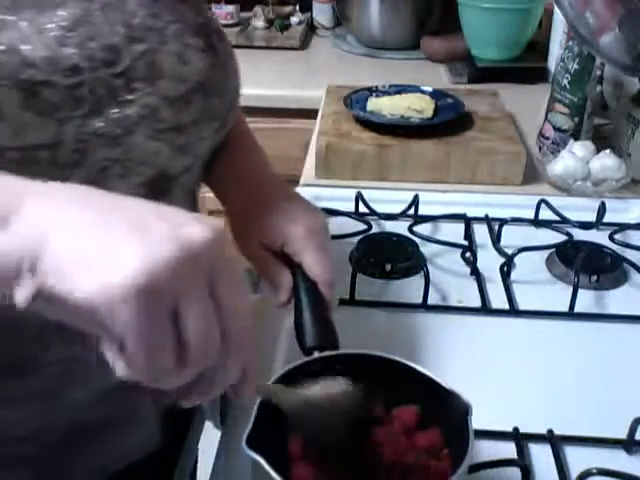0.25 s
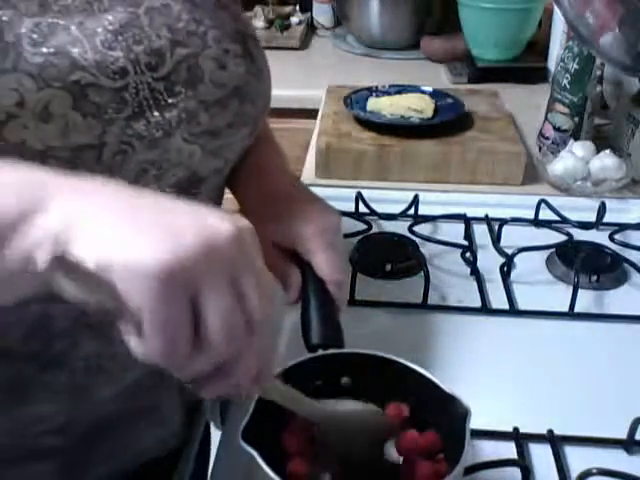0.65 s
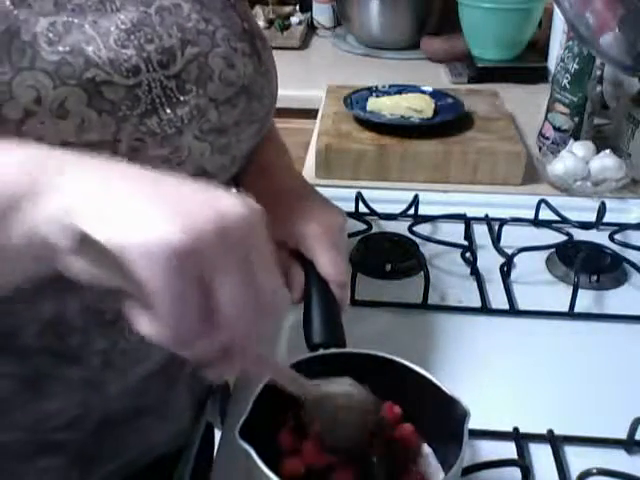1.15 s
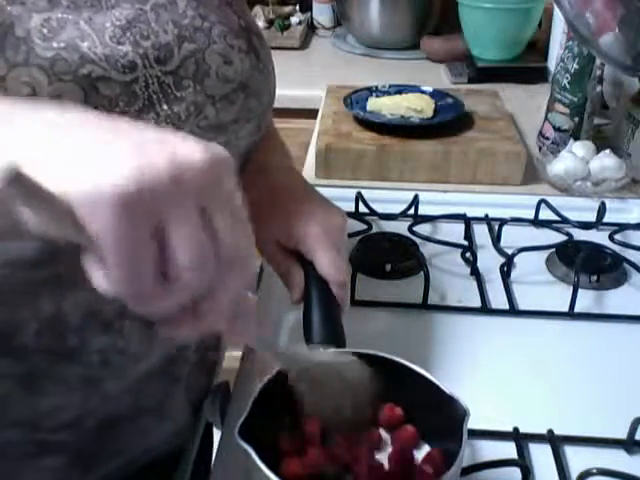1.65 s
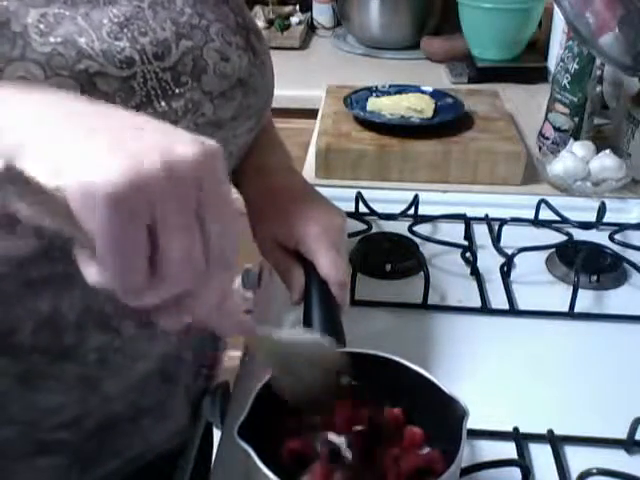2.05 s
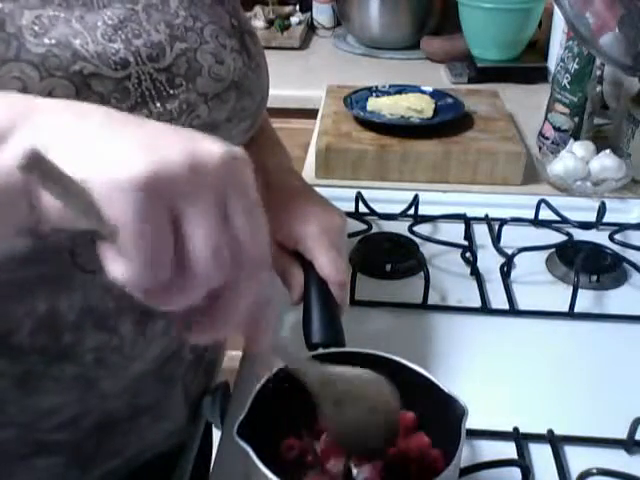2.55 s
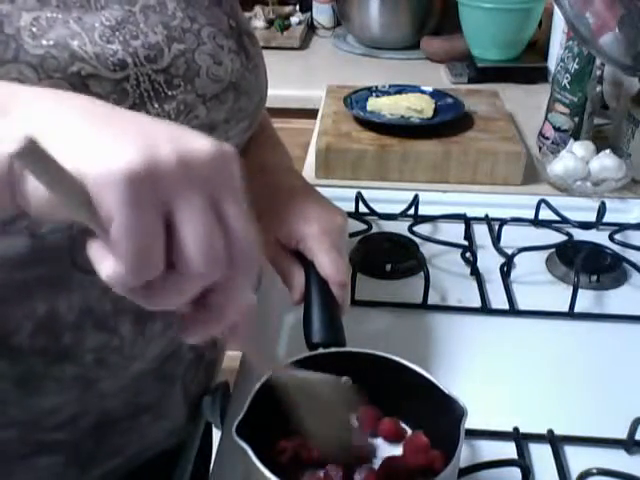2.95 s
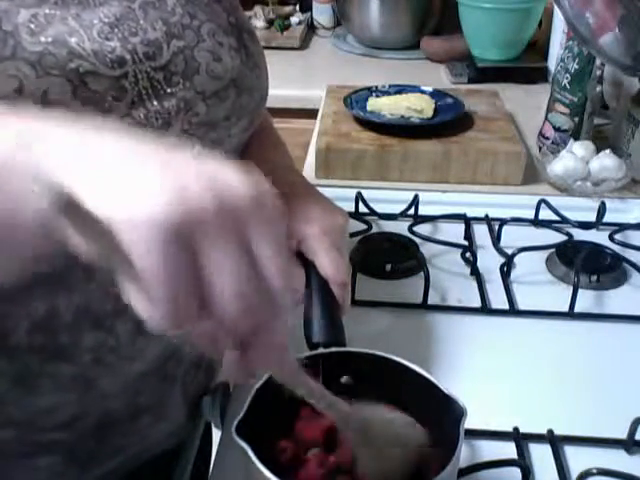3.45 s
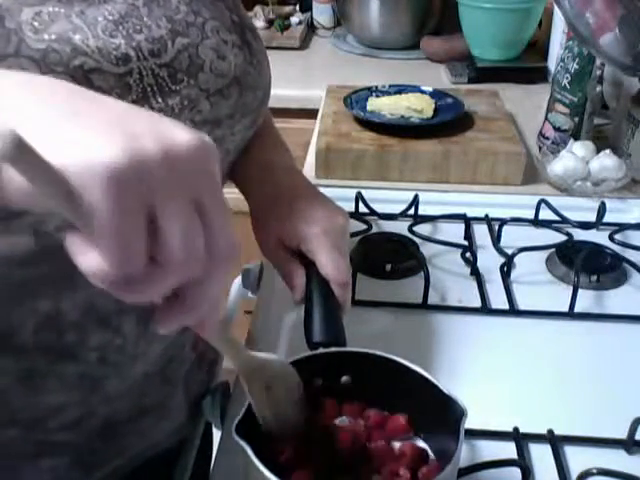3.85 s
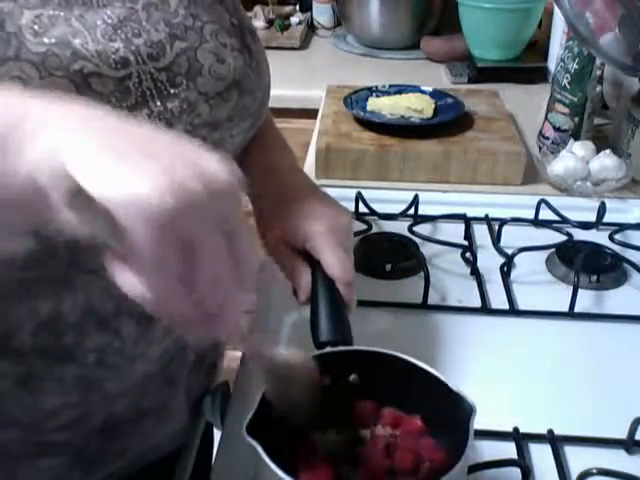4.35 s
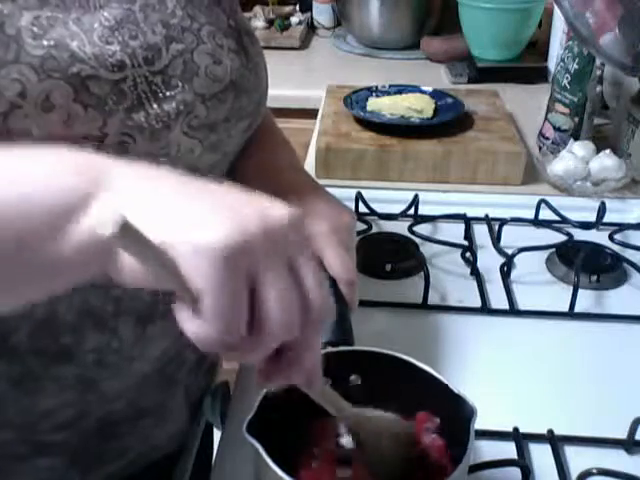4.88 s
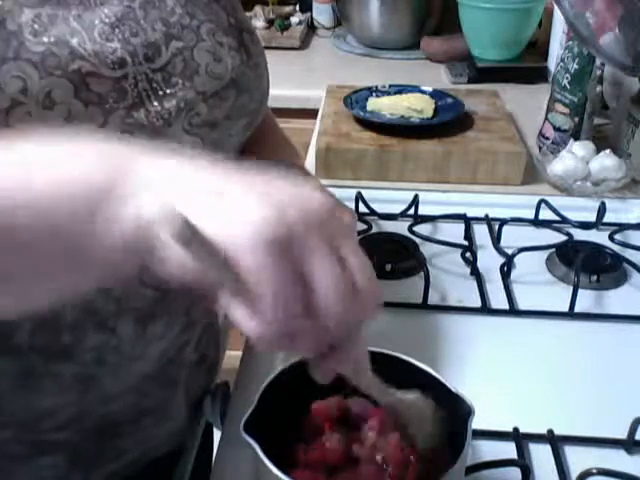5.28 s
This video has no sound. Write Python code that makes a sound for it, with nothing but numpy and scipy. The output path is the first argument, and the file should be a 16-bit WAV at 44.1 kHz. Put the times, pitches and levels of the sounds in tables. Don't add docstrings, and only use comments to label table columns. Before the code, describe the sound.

A wooden spoon stirs fruit and sugar in a small metal saucepan, close to a basic microphone. In the first 0.3 seconds it lands with a cluster of light clicking bounces and a soft thud. Faint gritty scrapes and muffled taps follow until a firm, dry knock at 1.06. Quiet dragging continues, with a small tap at 1.7. A harder clack at 2.17 is followed by quick bounces and a low stove thump, then a soft tap at 2.4. Subdued, sugary strokes fill about 2.5 to 4.3. The hardest crack, clipped, hits at 4.35, with bounces, the most obvious scrape around 4.55 and deep thuds to 4.65. Soft taps come near 5.0, a bright metallic wall knock rings at 5.37, and a thinner ring with a sugary crunch ends it at 5.5. Short hard-room echo, uneven low rumble, fridge hum, faint electronic whine and hiss run underneath.

```python
import sys
import numpy as np
from scipy import signal
from scipy.fft import rfft, irfft, next_fast_len
from scipy.io import wavfile
from scipy.ndimage import uniform_filter1d

SR = 44100
rng = np.random.default_rng(int(sys.argv[2]) if len(sys.argv) > 2 else 0)


def invert_db(x):
    u = np.asarray(x, float) / 20
    return 10 ** u


def wav_record(signal):
    frames = np.transpose(np.atleast_2d(signal))
    bounded = np.clip(frames, -1, 1)
    quanta = np.round(bounded * 32767).astype(np.int16)
    wavfile.write(sys.argv[1], SR, quanta)


N = 243431
T = np.arange(N) / SR
SIZE = 1024


def level(x, db):
    return x * invert_db(db) / np.sqrt(np.mean(x ** 2))


def ring(x, hz, t60_s):
    pole = np.exp(2j * np.pi * hz / SR - np.log(1000) / (max(t60_s, .004) * SR))
    out = signal.lfilter([0, pole.imag], [1, -2 * pole.real, abs(pole) ** 2], x)
    return out / abs(pole.imag) * np.sin(2 * np.pi * hz / SR)


def colour(x, spectrum):
    hz, db = np.transpose(spectrum)
    size = next_fast_len(N)
    axis = np.maximum(np.arange(size // 2 + 1) * SR / size, 1)
    gain = invert_db(np.interp(np.log(axis), np.log(hz), db))
    return irfft(rfft(x, size) * gain, size)[:N]


def walk(rate_hz):
    k = int(SR / rate_hz)
    return level(uniform_filter1d(uniform_filter1d(rng.standard_normal(N), k), k), 0)


def push(ms):
    phase = np.clip((np.arange(SIZE) + .5) / max(ms * SR / 1000, 1), 0, 1)
    force = np.sin(np.pi * phase)
    return force / force.sum()


def add(track, start_s, x):
    i = int(start_s * SR)
    track[..., i:i + x.shape[-1]] += x[..., :N - i]


def grains(rate_hz, spread_db):
    chance = rng.random((2, N))
    size = invert_db(-spread_db * np.log(chance[1]))
    return level((chance[0] < rate_hz / SR) * size * rng.standard_normal(N), 0)


def dense(strength, spectrum, t60_s):
    fade = signal.lfilter([1], [1, -np.exp(-np.log(1000) / (t60_s * SR))], strength)
    noise = level(colour(rng.standard_normal(N), spectrum), 0)
    return uniform_filter1d(fade, size=16, origin=7) * noise


# [start_s, crack_db, wall_db (free wall, relative to the crack), skid_ms]
BLOWS = [
    (1.0554, -6.5, -25, 4),
    (2.172, -2.5, -24, 8),
    (4.346, 2.5, -21.5, 9.9),
    (5.368, -1, -6.5, 5.1),
    (5.496, -39, 12, 8),
]
# [start_s, crack_db, low_bowl_db, base_db, skid_ms]
BOUNCES = [(0.0265, -27, -32, -26, 5.5), (.164, -28, -21, -36, 4.4), (.183, -20.5, -21, -26, 11),
           (.212, -45, -39, -36, 3.5), (.2325, -37, -24, -34, 9.4), (1.097, -40, -26, -36, 1.8),
           (2.206, -45, -24, -30, 7.6), (2.235, -25, -25, -34, 3.9), (2.244, -44, -25.5, -38, 17),
           (2.272, -24, -24, -22, 2.4), (4.390, -42, -21, -31, 4.5), (4.433, -31, -33, -22, 3),
           (4.439, -43, -24, -32, 7.3), (4.534, -26, -28, -31, 9), (4.650, -29, -51, -50, 4.2)]
# [start_s, base_db, skid_ms]
TAPS = [(.691, -42, 4.4), (.739, -35, 12), (.821, -36, 5.6), (0.933, -36.5, 3), (0.966, -35.5, 2.9),
        (1.737, -37, 4), (2.417, -32, 9.8), (3.461, -38, 3.9), (4.05, -38, 26), (4.958, -32, 3.3),
        (4.997, -35, 15)]


def knocks():
    rows = []
    for s, crack, wall, skid_ms in BLOWS:
        bowl = crack - 10 - 0.4 * (wall + 23.5)
        rows.append((s, crack, bowl, crack - 11.5, crack + wall, skid_ms))
    for s, crack, bowl, base, skid_ms in BOUNCES:
        rows.append((s, crack, bowl, base, base - 20, skid_ms))
    for s, base, skid_ms in TAPS:
        rows.append((s, base - 10, base - 4, base, base - 26, skid_ms))
    return rows


def contacts():
    force, strength = np.zeros((2, 4, N))
    step = np.arange(SIZE)
    touch = 1. * (step == 0)
    for s, *part_db, skid_ms in knocks():
        span = max(skid_ms, 1) * SR / 1000
        fade = np.clip((span - step) / 40, 0, 1)
        skid = touch + 0.57 * rng.standard_normal(SIZE) * fade / np.sqrt(span)
        gain = invert_db(np.array(part_db))[:, None]
        add(force, s, gain * invert_db([[-8], [-3], [-5], [-12]]) * [touch, skid, skid, touch])
        add(strength, s, gain)
    return force, strength


# [pitch_hz, level_db, t60_s (time to fall 60 dB)]
SPOON = [(1170, -5.5, 0.007), (1664, 5.5, 0.019), (2450, -8, 0.02), (2910, -12.5, 0.03), (4520, -37, 0.038),
         (5220, -40, 0.081)]
BOWL = [(345.5, -13.5, 0.18), (461, -5, 0.069), (543, -8.5, 0.14), (788, 2, 0.11), (811.5, -6, 0.27),
        (883, -2.5, .1)]
BASE = [(1011, -6, 0.092), (1150, 2.5, 0.053), (1220, 5.5, 0.035), (1314, -4.5, 0.12), (1760, -2.5, 0.049),
        (1760, -4, 0.13), (2300, -6, 0.034), (2860, -37, 0.21), (4140, -21, 0.014)]
WALL = [(1093, 0, .3), (1895, -1, .27), (2945, -6, .3), (4134, -11, .07), (4533, -13, .18), (4775, -12, .2),
        (5410, 0, .1), (5510, -12, .12), (6788, -14, .24), (7704, -7, .12), (8522, -3, .14),
        (8764, -11, .14), (8942, -10, .11), (9905, -11, .07)]
# [pitch_hz, level_db (per Hz)]
CRACK = [(250, -8), (700, -2.5), (1500, 6), (2600, -6), (5000, -17), (6500, -22.5), (12000, -26.5),
         (16000, -60)]
SHIMMER = [(1000, -27), (2500, -2.5), (4800, 4.5), (6000, -7), (8500, 3), (11000, -11), (13000, -29),
           (16000, -50)]
RATTLE = [(60, -27), (150, -0.5), (300, -2.5), (600, -2.5), (1200, -8.5), (2500, -23), (8000, -29)]


def struck_pan():
    force, strength = contacts()
    crack, bowl, _, wall = strength
    out = invert_db(-12.0) * dense(crack, CRACK, 0.049)
    out += invert_db(-8) * dense(wall, SHIMMER, .095)
    out += invert_db(-14) * dense(bowl, RATTLE, 0.29)
    contact_ms = (0.1, 1, 0.16, 0.023)
    for modes, f, ms in zip((SPOON, BOWL, BASE, WALL), force, contact_ms):
        f = signal.lfilter(push(ms)[:SIZE // 16], [1], f)
        for k, (hz, db, t60_s) in enumerate(modes):
            out += (-1) ** k * invert_db(db + 1.8 * walk(57)) * ring(f, hz, t60_s)
    return out


def dragged_pan(drag):
    slips = grains(1500, 1.36)
    rub = np.zeros(N)
    for k, (hz, db, t60_s) in enumerate(BOWL[:3] + BASE + SPOON[2:4]):
        rub += (-1) ** k * invert_db(db) * ring(slips, hz, 0.23 * t60_s)
    return drag * invert_db(1.44 * walk(54)) * level(rub, 0.13)


# [pitch_hz, level_db, t60_s]
TIP = [(1640, 6.5, 0.02), (2260, -15.5, .04)]
FLANK = [(1390, -2.5, 0.013), (1940, -31, .036), (2170, -16, 0.027), (4300, -15.5, 0.024),
         (4660, -17.5, 0.019), (4800, -26, 0.021), (8070, -35, .06), (8550, -35, 0.11), (2960, -29, .14)]
CORNER = [(1664, -8, 0.066), (1902, -0.5, 0.06), (2060, -4, 0.043), (2210, -6, 0.043), (3060, -16.5, 0.077),
          (2630, -14, .03), (3850, -21, 0.069), (4210, -15, 0.038), (5070, -25, 0.023)]
RIM = [(1410, -7, 0.024), (2640, -8.5, 0.016), (4330, -16.5, 0.052), (4754, -14, .04), (4800, -12.5, .038)]
EDGE = [(1590, 0, .02), (2330, -12, .03)]
# [start_s, pitch_hz, level_db, t60_s]
STRAYS = [(.170, 433, -22.5, 0.071), (.183, 2945, -39, .2), (.183, 4140, -42, 0.19),
          (.300, 1190, -39, 0.48), (2.172, 5420, -33, 0.092), (2.177, 1940, -26, .09),
          (.164, 2300, -33, .05), (.183, 2284, -32, .05), (2.173, 2360, -20, .06), (.028, 2760, -33, 0.027),
          (2.204, 4100, -38, .08), (2.236, 2950, -32, .04), (2.269, 593, -30, 0.016),
          (4.05, 3840, -46, 0.22), (4.433, 2960, -35, .05), (4.436, 1900, -43, 0.23),
          (4.533, 2060, -24.5, 0.04), (4.995, 1209, -33, 0.32), (5.49, 3750, -34, .15)]


def favoured():
    # start_s, modes, level_db
    spots = [(1.0555, FLANK, -3.5), (2.173, CORNER, -20), (4.347, CORNER, -3.5), (5.3685, RIM, -1.7)]
    spots += [(.0272, EDGE, -25), (.1828, EDGE, -15), (2.2715, EDGE, -16), (4.4325, EDGE, -19)]
    spots += [(s, TIP, crack) for s, crack, *_ in BOUNCES]
    rows = list(STRAYS)
    for s, modes, force_db in spots:
        rows += [(s, hz, db + force_db, t60_s) for hz, db, t60_s in modes]
    return rows


# [start_s, pitch_hz, level_db, hold_ms]
HELD = [(0.168, 1150, -26, 20), (.185, 1170, -16, 15.7), (0.211, 1130, -23, 6.9), (0.229, 1180, -28, 19),
        (.236, 817, -27.5, 13), (.262, 400, -33, 16), (1.061, 792, -18.5, 14), (2.177, 1183, -11, 10.3),
        (2.193, 1130, -23, 20), (2.243, 830, -26, 7), (2.242, 1180, -21.5, 9.3), (2.277, 1200, -22, 4.5),
        (4.351, 1159, -11, 24), (4.352, 769, -17.5, 21), (4.388, 1115, -24, 13), (4.436, 1165, -23, 23),
        (4.440, 797, -28, 14), (4.543, 1153, -27, 21), (5.370, 778, -11.5, 23.5)]


def pings():
    out, t = np.zeros(N), T[:8 * SIZE]
    for s, hz, db, t60_s in favoured():
        fade = np.exp(-np.log(1000) * t / max(t60_s, .005)) * np.clip(t * hz / 2, 0, 1)
        add(out, s, invert_db(db) * fade * np.sin(2 * np.pi * hz * t))
    for s, hz, db, hold_ms in HELD:
        swell = np.sqrt(np.abs(np.sin(np.pi * np.clip(t * 1000 / max(hold_ms, 2), 0, 1))))
        add(out, s, invert_db(db) * swell * np.sin(2 * np.pi * hz * t))
    return out


# [middle_s, length_s, drag_db, grit_db (sugar)]
SWEEPS = [(0.043, 0.1, -44, -49), (0.333, 0.29, -44.5, -50.5), (0.744, 0.18, -60, -47),
          (0.84, .1, -44, -50), (1.02, 0.082, -48, -58), (1.186, .16, -48, -49), (1.627, 0.26, -45, -49.5),
          (1.734, 0.084, -43, -56), (1.94, .2, -53, -50.5), (2.133, .1, -48, -64),
          (2.35, .26, -43.5, -44.5), (2.436, .07, -43, -48), (2.837, .1, -52, -48), (3.452, .3, -51, -58),
          (3.673, 0.19, -60, -45.5), (4.067, 0.29, -48, -45), (4.285, 0.14, -45, -58),
          (4.51, 0.22, -35, -49), (4.549, 0.11, -31, -36.5), (4.626, 0.37, -39, -47),
          (4.84, 0.12, -43.5, -52), (4.992, .16, -47, -46), (5.19, 0.41, -44, -53), (5.0, 1.6, -51, -49.5),
          (5.499, 0.11, -50, -37)]


def strokes():
    out = invert_db(np.array([[-60], [-55.5]])) * np.ones(N)
    for middle_s, length_s, *part_db in SWEEPS:
        speed = np.cos(np.pi * np.clip((T - middle_s) / length_s, -.5, .5)) ** 2
        out = np.maximum(out, invert_db(np.array(part_db))[:, None] * speed)
    return out


# [pitch_hz, level_db (per Hz)]
GRIT = [(200, -18), (500, -4.5), (1200, -1.5), (2500, -2.5), (5000, -9.5), (9000, -8), (13000, -14.5),
        (16000, -39)]


def sugar(grit):
    return grit * level(colour(grains(5000, 2.47), GRIT), 4.3)


def room(x):
    t = T[:SR // 2]
    t60_s, top_hz, echo_db = 0.3, 5230, -17.5
    fade = np.exp(-np.log(1000) * t / t60_s) * np.clip(t / 0.0014, 0, 1)
    tail = rng.standard_normal(len(t)) * fade
    tail = signal.lfilter(*signal.butter(1, top_hz, fs=SR), tail)
    return signal.fftconvolve(x, tail / np.sqrt(np.sum(tail ** 2)))[:N] * invert_db(echo_db)


# [start_s, level_db, push_ms, pitch_hz]
THUDS = [(0.264, -18.5, 2.3, 204), (0.832, -18, 6.4, 100), (1.093, -17, 7.6, 60), (2.202, -8, 7.1, 160),
         (2.241, -16, 2.5, 240), (2.302, -17.5, 1.4, 202), (2.268, -14.5, 2.1, 105), (2.429, -23, 5.7, 100),
         (4.362, -39, 2.9, 201), (4.42, -14.5, 5.6, 120), (4.591, -12, 13, 39.2), (4.604, -9.5, 3.7, 119),
         (4.618, -14, 5.4, 30), (4.64, -18, 15, 25), (4.95, -38, 13, 60)]
# [time_s, level_db]
RUMBLE = [(0.0, -27.5), (.12, -31), (.6, -39.5), (.88, -31), (1.3, -39), (1.7, -27), (2.15, -52),
          (2.28, -31), (2.7, -30.5), (3.3, -32), (3.8, -36.5), (4.0, -30.5), (4.4, -26), (4.84, -33.5),
          (5.0, -24), (5.25, -34.5), (5.52, -40)]


def stove():
    out = np.zeros(N)
    for s, db, push_ms, hz in THUDS:
        add(out, s, invert_db(db) * ring(np.pad(push(push_ms), (0, 8 * SIZE)), hz, 4.6 / hz))
    time_s, db = np.transpose(RUMBLE)
    tone = [(3, -21.5), (10, -2), (25, -10.0), (36, -26), (100, -25.0), (400, -61)]
    low = colour(rng.standard_normal(N), tone)
    return out + invert_db(np.interp(T, time_s, db)) * level(low, -1.4)


# [pitch_hz, level_db, width_hz (how fast it wavers)]
HUM = [(29.7, -38.5, 6.1), (58.6, -46, 4.7), (91, -59.5, 1.7), (120, -45, 1.66), (147, -53, 2.6),
       (167.6, -60.5, 1.7)]
# [pitch_hz, level_db]
WHINE = [(1217, -62), (5238, -70), (6998, -69), (8000, -61), (8699, -72), (12979, -73), (14998, -75)]
# [pitch_hz, level_db (per Hz)]
AIR = [(24, -21), (44, -3), (100, -11), (663, -20.5), (1180, -17.5), (1620, -24), (3740, -30), (16000, -35)]


def kitchen():
    out = np.zeros(N)
    for hz, db, width_hz in HUM:
        tone = np.sin(2 * np.pi * hz * T + 1.78 * walk(width_hz))
        out += level(tone * invert_db(0.8 * width_hz * walk(width_hz)), db)
    for hz, db in WHINE:
        out += level(np.sin(2 * np.pi * hz * T), db)
    air = colour(rng.standard_normal(N), AIR) * invert_db(.3 * walk(3))
    return out + level(air, -37.5)


def scene():
    drag, grit = strokes()
    near = struck_pan() + dragged_pan(drag) + pings() + sugar(grit)
    return (near + room(near) + stove() + kitchen())[None]


def band_limit(x):
    return signal.sosfilt(signal.butter(12, 15820, fs=SR, output="sos"), x)


def record(dry):
    mix = np.clip(dry, -1, 1)
    return band_limit(mix)


dry = scene()
out = record(dry)
wav_record(out)
```